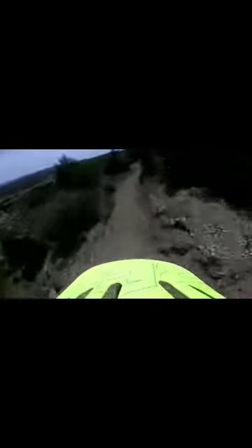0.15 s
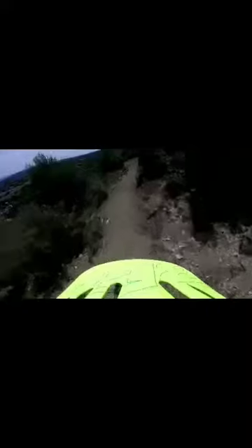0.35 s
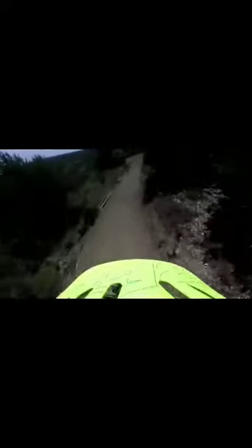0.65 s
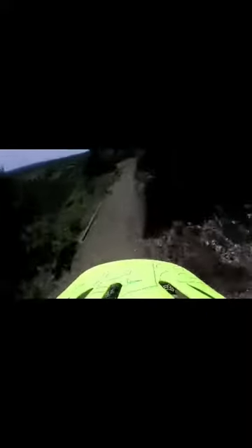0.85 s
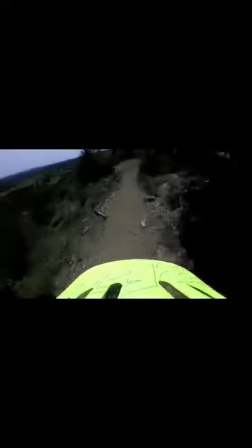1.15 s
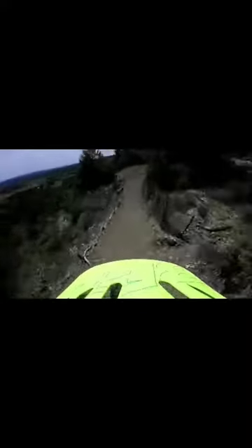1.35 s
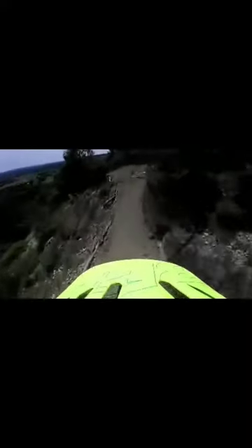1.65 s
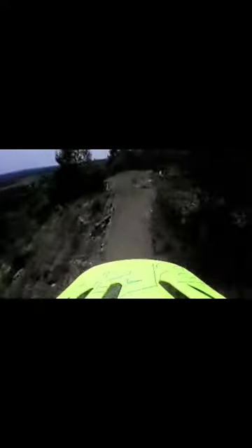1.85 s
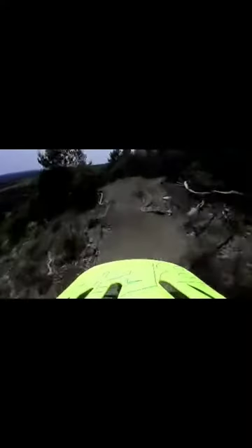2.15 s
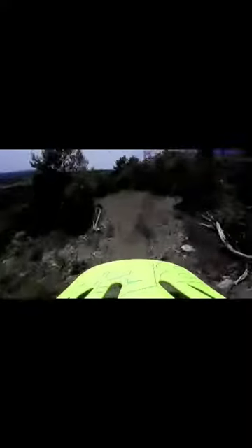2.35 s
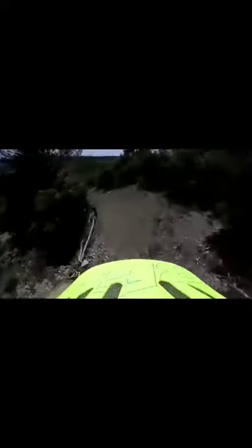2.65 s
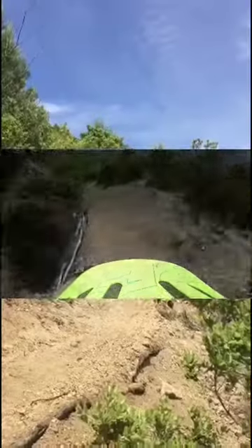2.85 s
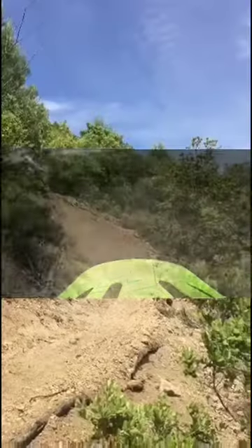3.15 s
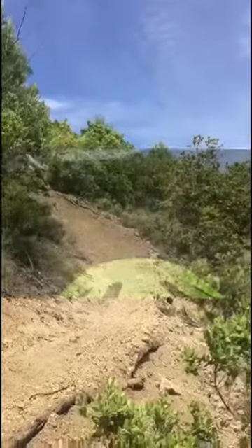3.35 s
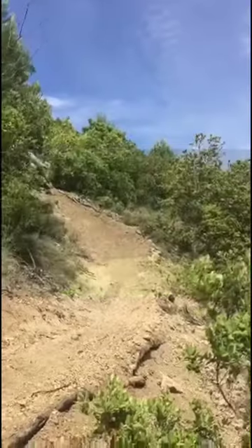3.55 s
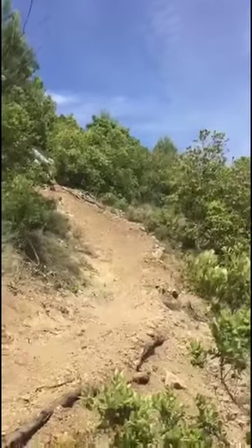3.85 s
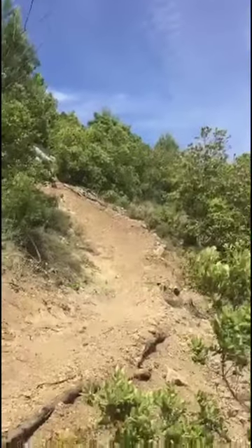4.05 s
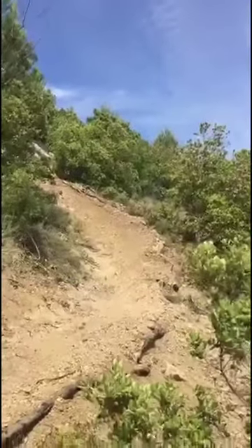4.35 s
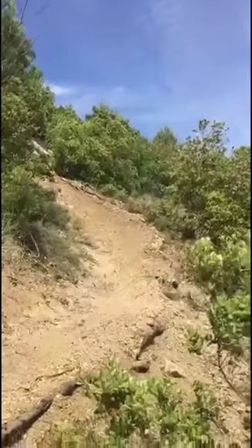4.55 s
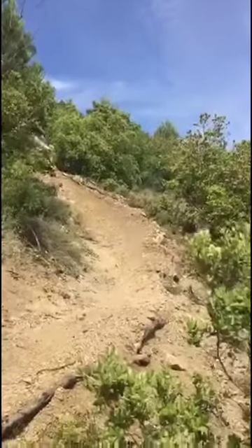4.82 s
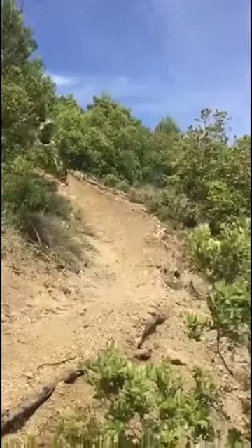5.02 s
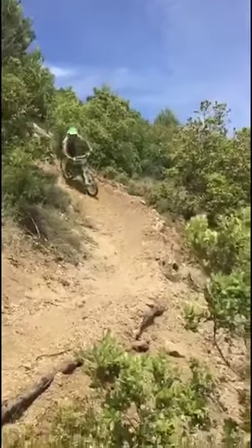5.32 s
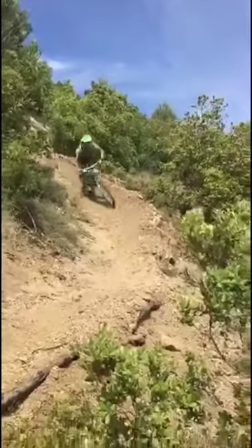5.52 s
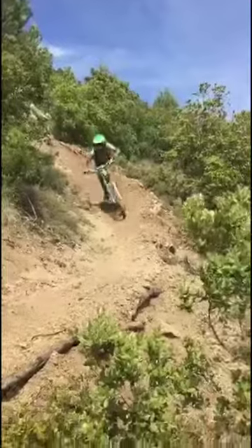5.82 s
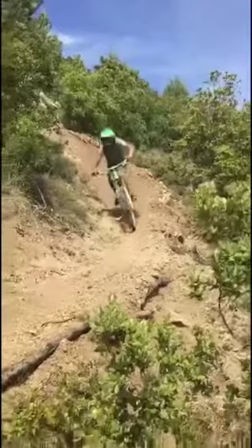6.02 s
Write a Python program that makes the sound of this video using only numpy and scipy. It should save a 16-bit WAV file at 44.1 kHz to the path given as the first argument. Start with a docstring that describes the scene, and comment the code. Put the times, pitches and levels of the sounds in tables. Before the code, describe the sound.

Outdoors on a dirt descent, muffled narrow-band sound close on a rider's helmet: fluctuating low wind, a thin whistling hiss, mount drumming and clicking rattles, ending in heavy jolts and a wind surge. Tyre crunch fades in beneath before the helmet sound cuts off. From the trailside come patchy, crackling scrapes of clods, grit and sand, busy stone clicks, and occasional high chain-like ticks, in a clearer but quieter perspective.

```python
"""A helmet camera rides a bicycle down a dry trail: wind buffets it, its mount drums, its closed housing
hisses and knocks. Wind, drumming and hiss are shaped noise; knocks and jolts set off dying tones.
The helmet sound stops abruptly, while the tyres fade in at a second microphone beside the trail.
They crunch and skid as patchy noise full of crackles, with stones, ticks and a low hum around them."""
import sys
import numpy as np
from scipy import signal
from scipy.io import wavfile
from scipy.ndimage import uniform_filter1d

SR = 44100
rng = np.random.default_rng(int(sys.argv[2]) if len(sys.argv) > 2 else 0)


def store_wav(level_fs):
    """Save 16-bit WAV to argv[1]."""
    pcm = np.round(np.clip(np.atleast_2d(level_fs), -1, 1) * 32767)
    wavfile.write(sys.argv[1], SR, pcm.T.astype(np.int16))


N = 272582  # length of the sound in samples

# How wind and hiss change on the ride. Each row: time in seconds, wind level in dB, hiss level in dB.
RIDE_LEVELS = [(0.0, -24.5, -51.5), (0.15, -32.5, -54), (0.6, -41, -53.5), (1.05, -33, -48.5),
               (1.27, -34.5, -44), (1.42, -35.5, -48.5), (1.72, -35.5, -48.5), (1.82, -29.5, -50),
               (2.1, -32, -53), (2.29, -33, -56), (2.35, -30.5, -46.5), (2.62, -41, -60.5),
               (2.8, -44.5, -55), (2.95, -39, -46), (3.02, -20.5, -37.5), (3.17, -18, -47.5),
               (3.36, -39.5, -58), (3.57, -31, -58), (3.66, -51, -53.5)]
# Colour of the wind buffeting. Each row: pitch in Hz, relative level per Hz in dB.
WIND_COLOUR = [(3, -20.5), (6, 16), (15, 3), (24, 0.5), (34, -15.5), (48, -7.5), (64, -23), (100, -45),
               (200, -70)]
# Modes of the mount, the second shaken by the wind. Each row: pitch in Hz, rough width in Hz.
MOUNT_MODES = [(85, 9), (49, 8), (155, 16)]
# The mount drums over rough stretches. Each row: start in seconds, length in seconds, level in dB.
DRUMMING = [(0.097, 0.134, -42.5), (0.411, 0.18, -39.5), (0.674, 0.15, -39), (0.897, 0.19, -42.5),
            (1.177, 0.41, -37.5), (1.612, 0.11, -40.5), (1.862, 0.22, -45.5), (2.325, 0.035, -30.5),
            (2.427, 0.059, -33.5), (2.721, 0.136, -42), (2.994, 0.024, -22.5), (3.132, 0.091, -28),
            (3.273, 0.15, -45.5)]
# How drumming comes and goes: attack in seconds, release in dB per second, resting level in dB.
DRUMMING_SHAPE = (0.014, 220, -50.5)
# Colour of the hiss through the closed housing. Each row: pitch in Hz, relative level per Hz in dB.
HISS_COLOUR = [(70, -30), (115, -10.5), (135, -6), (156, -3), (200, -16.5), (380, -17.5), (630, -19),
               (990, -28), (1200, -19), (1480, -19), (1700, -8.5), (2010, -22), (2520, -11), (3140, -19),
               (3630, -29), (5500, -37.5), (7000, -63.5)]
# How far each pitch follows the hiss level. Each row: pitch in Hz, share (1 is fully).
HISS_SURGE = [(300, 0.44), (1000, 0.13), (2500, 0.97), (5000, 0.45)]
# The hiss sings in the housing. Each row: pitch in Hz, rough width in Hz, level over the hiss level in dB.
HISS_WHISTLES = [(2520, 160, -8), (3066, 200, -13.5)]
# Modes of the housing. Each row: pitch in Hz, relative level in dB, time to fall by 60 dB in seconds.
HOUSING_MODES = [(450, -6.5, 0.027), (572.4, -9, 0.026), (912, -14, 0.053), (1140, -4.5, 0.0057),
                 (1365, 7, 0.012), (1703, 4.5, 0.01), (2305, 4, 0.011), (2520, 4.5, 0.01),
                 (2980, -6.5, 0.0128), (3300, -24, 0.0078)]
# Hard knocks on one spot. Each row: time in seconds, relative level in dB, pitch of the spot in Hz,
# length in seconds, snap in dB and rebound in dB (both relative to the knock).
HARD_KNOCKS = [(2.19, -32, 2400, 0.0014, -9, -19), (2.34, -22, 1560, 0.00211, -33.5, -21.5),
               (2.4118, -12.5, 1470, 0.0013, -44, -19.5), (2.419, -12, 1900, 0.0021, -31, -20),
               (3.0137, -8.5, 1590, 0.0022, -45, -11.5), (3.1545, -6.5, 2520, 0.0024, -9, -28.5),
               (3.162, -4.5, 1410, 0.0011, -45, -16), (3.1891, -2.5, 2130, 0.0047, -36.5, -23),
               (3.2285, -25.5, 1400, 0.002, -42, -25), (3.293, -35.5, 1250, 0.00175, -40, -20)]
# The camera rattles lightly in its housing. Each row: time in seconds, relative level in dB.
RATTLES = [(0.072, -34), (0.1276, -31.5), (0.2178, -28), (0.2903, -26), (0.424, -26), (0.5234, -27),
           (0.816, -22), (0.907, -35), (0.934, -24.5), (1.0096, -29), (1.0717, -31.5), (1.17, -36.5),
           (1.284, -32), (1.4973, -37), (1.5586, -27.5), (1.5816, -30.5), (1.7247, -40), (1.759, -31),
           (1.8348, -35), (1.858, -31), (1.905, -31), (2.031, -35), (2.0841, -32), (2.1168, -29),
           (2.2505, -32.5), (2.2977, -29), (2.4677, -33.5)]
# Hard jolts, and last a slow low swell of wind pressure just before the helmet sound stops. Each row: time in
# seconds, relative level in dB, pitch of the thump in Hz.
HARD_JOLTS = [(2.335, -23, 91), (2.408, -19.5, 63.5), (3.01, -10.5, 73), (3.157, -9.5, 48.5),
              (3.19, -8, 75), (3.223, -30, 52.4), (3.658, -25, 28)]
# Helmet and mount ringing after a jolt. Each row: pitch in Hz, level relative to the thump in dB,
# time to fall by 60 dB in seconds.
HELMET_RINGING = [(52.7, -13, 0.47), (165.4, -19, 0.1), (269, -18, 0.094)]
# The tyres beside the trail fade in. Each row: time in seconds, gain in dB.
TYRE_FADE = [(2.9, -24), (3.2, -8), (3.45, -0.2)]
# The tyres dig in, patch after patch. Each row: start in seconds, length in seconds,
# relative crunch level in dB, grit over crunch in dB, sand over crunch in dB.
SKID_PATCHES = [(3.195, 0.286, -53, -4, -27), (3.477, 0.2, -49.5, -6, -34), (3.676, .025, -50.5, -9, -22),
                (3.715, 0.055, -48, -8, -37.5), (3.787, .11, -46, -9.5, -24),
                (3.906, 0.062, -47, -9.5, -20), (3.959, 0.083, -48, -7.5, -21.5),
                (4.07, 0.068, -54.5, -16, -28), (4.115, 0.075, -50, -8, -30), (4.229, 0.0835, -52, -8, -36),
                (4.319, 0.0652, -47, -10.5, -22), (4.406, 0.036, -51.5, -10, -24),
                (4.458, 0.036, -56.5, -6.5, -8), (4.526, 0.16, -50.5, -3, -19),
                (4.671, 0.11, -47.5, -7, -13), (4.79, .13, -44, -6, -23), (4.947, 0.053, -60, -3, -16),
                (4.99, 0.03, -45.5, -4, -11.5), (5.033, 0.041, -48, -4, -9.5),
                (5.101, 0.054, -58, -11, -5.5), (5.256, 0.054, -54, 0, -5), (5.344, 0.03, -44, -6.5, -12.5),
                (5.402, 0.02, -46, -5.5, -10.5), (5.427, 0.046, -56.5, -1, -1.5),
                (5.478, 0.035, -49.5, -3, -8.5), (5.52, 0.0365, -52, -11, -11),
                (5.558, 0.066, -47.5, -9.5, -12), (5.627, 0.093, -46, -14, -19.5),
                (5.747, 0.093, -46.5, -14.5, -18.5), (5.845, 0.057, -48.5, -10.5, -19),
                (5.907, 0.02, -44, -13, -21), (5.953, 0.16, -51.5, -11.5, -21),
                (6.076, .07, -48.5, -11.5, -21), (6.159, .03, -42.5, -18, -30)]
# How a patch comes and goes: attack in seconds, release in dB per second, resting crunch level in dB.
PATCH_SHAPE = (0.0093, 323, -63)
# Colours of the clods, grit, sand and low roll. Each row: pitch in Hz, relative level per Hz in dB.
CLOD_COLOUR = [(300, -21.5), (520, -5.5), (850, -3.5), (1300, -5.5), (1900, -11), (3000, -46)]
GRIT_COLOUR = [(1200, -17), (2000, -1), (3000, 0.9), (4200, -13.5), (6000, -45.5)]
SAND_COLOUR = [(2800, -29), (4200, 1), (5500, -0.5), (7000, -1), (8200, -14.5)]
ROLL_COLOUR = [(40, -41), (65, -3.5), (90, 6), (230, -1), (330, 3.5), (420, -40.5)]
# The low roll of the tyres, before it follows the crunch. Each row: time in seconds, level in dB.
ROLL_LEVELS = [(3.7, -55.5), (4.3, -52.5), (4.42, -48.5), (4.51, -63), (4.55, -51), (4.66, -56),
               (4.69, -47.5), (5.13, -53.5), (5.18, -64), (5.25, -62), (5.28, -53.5), (5.34, -62),
               (5.5, -56), (5.62, -52.5), (5.71, -63), (5.79, -50.5), (5.86, -57), (6.18, -60)]
# Stones kicked and crushed. Each row: time in seconds, relative level in dB, centre pitch in Hz,
# length in seconds.
STONE_HITS = [(3.432, -38.5, 2480, .004), (3.488, -32.5, 1157, .01), (3.515, -32, 1420, 0.016),
              (3.523, -37.5, 2920, 0.0064), (3.692, -35, 1600, .008), (3.75, -38.5, 1160, .006),
              (3.845, -34, 880, 0.0067), (3.908, -34, 795, 0.013), (4.127, -46, 685, 0.0074),
              (4.182, -41, 550, 0.0097), (4.246, -42, 830, 0.0076), (4.349, -35.5, 603, 0.014),
              (4.405, -43, 460, .006), (4.427, -40, 527, 0.0069), (4.541, -28.5, 890, .003),
              (4.559, -30.5, 1300, 0.004), (4.581, -32, 1240, 0.0036), (4.608, -32.5, 1450, 0.0026),
              (4.629, -31, 2270, 0.0026), (4.645, -34, 960, .004), (4.671, -29.5, 930, 0.0031),
              (4.686, -33, 500, 0.0045), (4.732, -29, 1290, 0.0023), (4.74, -30, 1430, 0.012),
              (4.763, -36, 1350, 0.0036), (4.799, -33, 793, 0.013), (4.823, -34, 1870, 0.0074),
              (4.846, -39, 3300, .004), (4.861, -38, 2900, 0.0058), (4.873, -39, 950, 0.0079),
              (4.913, -26.5, 1510, 0.00255), (4.992, -32.5, 2800, 0.0089), (5.005, -31, 930, 0.0067),
              (5.052, -30.5, 766, 0.0075), (5.079, -31, 3340, 0.0062), (5.099, -36.5, 2190, 0.0044),
              (5.305, -35.5, 2800, 0.0068), (5.352, -34, 860, 0.016), (5.409, -34, 1500, 0.0069),
              (5.479, -39, 1660, 0.013), (5.498, -39, 1550, 0.0055), (5.579, -37, 895, 0.01),
              (5.758, -32.5, 663, 0.0049), (5.789, -33, 600, .005), (5.917, -33, 1100, 0.0084),
              (6.081, -39, 656, 0.01), (6.172, -32, 824, 0.011)]
# Sharp high ticks, likely the chain. Each row: time in seconds, relative level in dB.
SHARP_TICKS = [(3.6855, -41), (4.3478, -42), (4.685, -40), (5.0784, -28.5), (5.124, -38), (5.359, -37.5),
               (5.493, -34.5), (5.532, -39), (5.598, -33.5), (5.818, -39), (5.8857, -43), (5.9202, -38)]
# Swells of a low hum, likely tyre and frame. Each row: start in seconds, length in seconds, level in dB.
HUM_SWELLS = [(4.95, 0.13, -54.5), (5.41, 0.11, -52), (5.63, 0.049, -47.5), (5.77, 0.098, -52.5),
              (6.119, .06, -53)]
# How a swell comes and goes: attack in seconds, release in dB per second, resting level in dB.
SWELL_SHAPE = (0.025, 115, -71)

CUT_S, HELMET_EDGE_HZ = 3.666, 5600  # when the helmet camera stops, and the top of its narrow band
USUAL_HISS_DB = -47  # the surge brightens the hiss above this level and dulls it below
REBOUND_S = 0.0075  # delay of the camera's rebound after a knock
RATTLE_HZ, RATTLE_S = 2400, 0.0017  # pitch of the struck spot, length of the blow
RATTLE_SNAP_DB, RATTLE_REBOUND_DB = -35, -6.5
THUMP_T60_S = 0.1
PING_S, PING_DB, PING_HZ, PING_T60_S = 3.192, -35, 1830, 0.33
REST_GRIT_DB, REST_SAND_DB = -7.5, -11  # over the crunch, between patches
ROLL_FOLLOWS = 0.28  # share of the crunch's swings that the low roll follows
HUM_HZ = 279.8
TRAIL_EDGE_HZ, LAST_EDGE_HZ = 7950, 15800  # top of the trail-side microphone, top of the whole


def helmet():
    """All the helmet sounds pass through the small camera's narrow band and stop abruptly."""
    t = np.arange(N) / SR
    wind_db, hiss_db = columns(RIDE_LEVELS, t)
    out = wind(wind_db) + mount(wind_db) + housing_hiss(hiss_db)
    out += hard_knocks() + light_rattles(hiss_db) + jolts()
    return low_pass(out, HELMET_EDGE_HZ) * (t < CUT_S)


def wind(wind_db):
    """Wind buffets the camera: low noise with a slightly restless level."""
    return gain_of(wind_db) * steady(WIND_COLOUR, size=4096, patchy_db=0.5, flicker_db=1.0)


def mount(wind_db):
    """The mount sounds at its own pitches: two drum over rough ground, one is shaken by the wind."""
    low_mode, wind_mode, high_mode = MOUNT_MODES
    drum_gain = gain_of(spells(*np.transpose(DRUMMING), *DRUMMING_SHAPE))
    drumming = drum_gain * (waver(*low_mode) + 0.17 * waver(*high_mode))
    return drumming + gain_of(wind_db - 10) * waver(*wind_mode)


def housing_hiss(hiss_db):
    """Hiss through the closed housing changes colour as it surges, and sings at two pitches."""
    def shape_db(hz, t):
        surge_db = columns(RIDE_LEVELS, t)[1] - USUAL_HISS_DB
        return read(HISS_COLOUR, hz) + read(HISS_SURGE, hz) * surge_db

    hiss = noise(shape_db, size=512, patchy_db=2.0, flicker_db=1.17)
    out = gain_of(-49) * evened(hiss)
    for hz, width_hz, over_db in HISS_WHISTLES:
        out += gain_of(hiss_db + over_db) * waver(hz, width_hz)
    return out


def hard_knocks():
    """Hard blows on one spot of the housing ring mostly the modes near that spot's pitch."""
    out = np.zeros(N)
    draws = rng.standard_normal((len(HARD_KNOCKS), 900))
    for (s, *blow), draw in zip(HARD_KNOCKS, draws):
        add(out, s - 0.001, knock(draw, *blow, spread=0.638, firm=0.37))
    return out


def light_rattles(hiss_db):
    """The camera rattles lightly in its housing, shaking all of it, over many fainter rattles."""
    out = np.zeros(N)
    blow = RATTLE_HZ, RATTLE_S, RATTLE_SNAP_DB, RATTLE_REBOUND_DB
    draws = rng.standard_normal((len(RATTLES), 900))
    for (s, level_db), draw in zip(RATTLES, draws):
        add(out, s - 0.001, knock(draw, level_db, *blow, spread=4.0, firm=1.1))
    hits = gain_of(1.8 * rng.exponential(1, N)) * (rng.random(N) < 45 / SR)  # about 45 per second
    one_rattle = knock(rng.standard_normal(900), 0, *blow, spread=2.4)
    faint = evened(signal.oaconvolve(hits, one_rattle)[:N])
    return out + gain_of(hiss_db - 14.5) * faint


def jolts():
    """A hard jolt thumps and leaves helmet and mount ringing, as does a slow swell of wind pressure just before
    the helmet sound stops; the hardest knock leaves a thin ping."""
    out = np.zeros(N)
    shell = sum(ringing(db, hz, t60) for hz, db, t60 in HELMET_RINGING)
    for s, level_db, thump_hz in HARD_JOLTS:
        add(out, s, gain_of(level_db) * (ringing(0, thump_hz, THUMP_T60_S) + shell))
    add(out, PING_S, ringing(PING_DB, PING_HZ, PING_T60_S))
    return out


def knock(draw, level_db, hz, length, snap_db, rebound_db, spread, firm=0.8):
    """Impacts ring the housing, most near the struck spot; a snap is added and the camera rebounds once."""
    t = np.arange(SR // 20) / SR
    ring = np.zeros(len(t))
    for mode_hz, db, t60 in HOUSING_MODES:
        reach = np.exp(-(np.log2(mode_hz / hz) / spread) ** 2) + 0.13  # far modes still sound a little
        ring += reach * gain_of(db - 60 * t / t60) * np.sin(2 * np.pi * mode_hz * t)
    ring *= (1 - np.exp(-t / 0.00052)) ** 2  # soft start
    sound = unit(signal.fftconvolve(burst(draw, length, firm), ring), length)
    snap = resonate(resonate(burst(draw, 1.1 * length, firm), 4700, 3600), 4700, 3600)
    add(sound, 0, gain_of(snap_db) * unit(snap, length))
    rebound = signal.fftconvolve(burst(draw[::-1], length), ring)
    add(sound, REBOUND_S, gain_of(rebound_db) * unit(rebound, length))
    return gain_of(level_db) * 0.52 * sound


def tyres():
    """Tyres dig into clods, grit and sand: each is a patchy wash with crackles, over a low roll."""
    start, length, db, grit_over, sand_over = np.transpose(SKID_PATCHES)
    attack_s, release, rest_db = PATCH_SHAPE
    clods_db = spells(start, length, db, attack_s, release, rest_db)
    grit_db = spells(start, length, db + grit_over, attack_s, release, rest_db + REST_GRIT_DB)
    sand_db = spells(start, length, db + sand_over, attack_s, release, rest_db + REST_SAND_DB)
    swings_db = clods_db - uniform_filter1d(clods_db, size=SR // 2)
    roll_db = columns(ROLL_LEVELS, np.arange(N) / SR)[0] + ROLL_FOLLOWS * swings_db

    scrape = (2, 20)  # patches narrow in pitch and drawn out in time colour the scraping
    clods = 0.94 * steady(CLOD_COLOUR, size=256, patchy_db=3.0, flicker_db=1.0, patch=scrape)
    clods += 0.63 * grains(CLOD_COLOUR, per_s=450, cycles=4.1, spread_db=2.8, count=10)
    grit = 1.33 * steady(GRIT_COLOUR, size=256, patchy_db=4.5, flicker_db=1.0, patch=scrape)
    grit += 0.5 * grains(GRIT_COLOUR, per_s=450, cycles=6, spread_db=1.6, count=8)
    sand = 1.16 * steady(SAND_COLOUR, size=256, patchy_db=5.5, flicker_db=1.5, patch=scrape)
    sand += 0.18 * grains(SAND_COLOUR, per_s=420, cycles=19, spread_db=1.8, count=10)
    roll = steady(ROLL_COLOUR, size=1024, patchy_db=2.0, flicker_db=0.8)

    crunch = tread_bites() * (gain_of(clods_db) * clods + gain_of(grit_db) * grit)
    return crunch + gain_of(sand_db) * sand + gain_of(roll_db) * roll


def tread_bites():
    """Tread knobs bite in about 110 times a second; each bite lifts the crunch and dies away in 6 ms."""
    sizes = gain_of(4 * np.minimum(rng.exponential(1, N), 3))
    hits = sizes * (rng.random(N) < 110 / SR)
    dying = signal.lfilter([1], [1, -np.exp(-1 / (0.006 * SR))], hits)
    return 0.68 + 0.32 * evened(dying)


def grains(points, per_s, cycles, spread_db, count):
    """Short crackles of many pitches, each pitch with its own sparse train of uneven sizes."""
    out = np.zeros(N)
    for hz in np.geomspace(points[1][0], points[-2][0], count):
        t = np.arange(int(3 * cycles * SR / hz)) / SR
        hits = rng.random((int(per_s / count * N / SR), 2))
        places = (hits[:, 0] * N).astype(int)
        size = np.zeros(N)
        size[places] = gain_of(spread_db * np.minimum(-np.log(1 - hits[:, 1]), 4))
        crackle = np.sin(2 * np.pi * hz * t) * t * hz * np.exp(-2 * t * hz / cycles)
        level = gain_of(read(points, hz)) * hz / cycles
        out += level * signal.oaconvolve(size, crackle)[:N] / 1000
    return evened(out)


def stones():
    """Each stone gives a dry crack and a noisy crunch around its pitch, swelling when long."""
    out = np.zeros(N)
    draws = rng.standard_normal((len(STONE_HITS), 1800))
    for (s, level_db, hz, length), draw in zip(STONE_HITS, draws):
        swell = 1 - np.exp(-np.arange(len(draw)) / (0.47 * abs(length) * SR))
        crunch = burst(draw * swell, length, firm=0.45)
        for width_hz in (0.5 * hz, hz, 1.5 * hz):
            crunch = resonate(crunch, hz, width_hz)
        crack = resonate(resonate(burst(draw, 0.0015, firm=0.3), 2300, 1900), 2300, 2400)
        stone = 0.36 * unit(crunch, abs(length)) + 0.11 * unit(crack, 0.0012)
        add(out, s - 0.001, gain_of(level_db) * stone)
    return out


def ticks():
    """Sharp ticks, likely the chain: brief bursts of impacts through one high, wide resonance."""
    out = np.zeros(N)
    draws = rng.standard_normal((len(SHARP_TICKS), 600))
    for (s, level_db), draw in zip(SHARP_TICKS, draws):
        tick = resonate(burst(draw, 0.0053, firm=0.22), 6500, 3700)
        add(out, s - 0.001, gain_of(level_db) * 0.34 * unit(tick, 0.003))
    return out


def hum():
    """A fuzzy low tone, likely tyre and frame, comes and goes in swells."""
    return gain_of(spells(*np.transpose(HUM_SWELLS), *SWELL_SHAPE)) * waver(HUM_HZ, 24)


def burst(draw, length, firm=0.8):
    """One firm impact amid a cluster of tiny ones that dies out soon after the length."""
    t = np.arange(len(draw)) / SR
    rubble = draw * (1 - np.exp(-t / 0.00098)) * np.exp(-(t / max(length, 0.0006)) ** 1.5)
    impact = np.arange(len(draw)) == 30  # a single sample
    return rubble + firm * np.linalg.norm(rubble) * impact


def ringing(peak_db, hz, t60):
    """One mode, struck softly and dying away."""
    u = np.arange(SR // 2) / SR
    return gain_of(peak_db - 60 * u / t60) * np.sin(2 * np.pi * hz * u) * (1 - np.exp(-u / 0.0034))


def waver(hz, width_hz):
    """A fuzzy tone: resonating noise that drifts in pitch but keeps a fairly even strength."""
    tone = resonate(resonate(rng.standard_normal(N), hz, width_hz), hz, 2 * width_hz)
    strength = np.sqrt(uniform_filter1d(tone ** 2, size=int(SR / hz)) + 0.19 * np.mean(tone ** 2))
    return evened(tone / strength ** 0.55)


def spells(starts, lengths, levels_db, attack_s, release_db_per_s, rest_db):
    """Level in dB of spells that rise, hold and die away over a steady rest; their powers add."""
    power = np.full(N, gain_of(rest_db) ** 2)
    for s, length, db in zip(starts, lengths, levels_db):
        u = np.arange(round((length + 0.4) * SR)) / SR
        rise = np.minimum(u / attack_s, 1)
        fall = gain_of(db - release_db_per_s * np.maximum(u - length, 0))
        add(power, s, (rise * fall) ** 2)
    return 10 * np.log10(power)


def noise(shape_db, size, patchy_db, flicker_db, patch=(6, 8)):
    """Random short-time spectra; shape_db(hz, t) gives the level; patches and shared flicker roughen it."""
    hop = size // 4
    t = np.arange(N // hop + 5) * hop / SR
    hz = np.fft.rfftfreq(size, 1 / SR)[:, None]
    a, b, patches = rng.standard_normal((len(t), len(hz), 3)).T
    patches = uniform_filter1d(patches, size=patch[0], axis=0)  # along pitch
    patches = evened(uniform_filter1d(patches, size=patch[1], axis=1))  # along time
    flicker = evened(uniform_filter1d(rng.standard_normal(len(t)), size=3))
    level = gain_of(shape_db(hz, t) + patchy_db * patches + flicker_db * flicker)
    return signal.istft((a + 1j * b) * level, nperseg=size, noverlap=size - hop)[1][:N]


def steady(points, size, patchy_db, flicker_db, patch=(6, 8)):
    """Noise whose underlying colour stays the same, scaled to rms 1."""
    return evened(noise(lambda hz, t: read(points, hz) + 0 * t, size, patchy_db, flicker_db, patch))


def resonate(x, hz, width_hz):
    """A fixed resonance, as a two-pole peak."""
    return signal.lfilter(*signal.iirpeak(hz, hz / width_hz, SR), x)


def low_pass(x, hz):
    """Removes what lies above hz, without delay."""
    return signal.oaconvolve(x, signal.firwin(511, hz, window=("kaiser", 9), fs=SR), "same")


def gain_of(db):
    """Turns dB into a plain factor."""
    return 10 ** (np.asarray(db) / 20)


def evened(x):
    """Scales a signal to rms 1."""
    return x / np.sqrt(np.mean(x ** 2) + 1e-20)


def unit(sound, length):
    """Scales a short sound to rms 1 over its length."""
    return sound / np.sqrt(np.sum(sound ** 2) / (SR * length))


def read(points, hz):
    """Reads a table of pitches at hz, with straight lines over log pitch."""
    f, value = np.transpose(points)
    return np.interp(np.log(hz + 1), np.log(f + 1), value)


def columns(rows, t):
    """Reads each column of a timed table at the times t, with straight lines between rows."""
    s, *values = np.transpose(rows)
    return [np.interp(t, s, v) for v in values]


def add(mix, s, sound):
    """Adds a sound into the mix from second s on."""
    part = mix[round(s * SR):][:len(sound)]
    part += sound[:len(part)]


def scene():
    """The helmet camera, then the trail side, where the tyres fade in."""
    fade = gain_of(columns(TYRE_FADE, np.arange(N) / SR)[0])
    trail_side = fade * tyres() + stones() + ticks() + hum()
    return (helmet() + low_pass(trail_side, TRAIL_EDGE_HZ))[None]


def record(dry):
    """A faint electronic hiss, then the last band limit."""
    hiss = gain_of(-93.5) * rng.standard_normal(N)
    return low_pass(dry[0] + hiss, LAST_EDGE_HZ)[None]


dry = scene()
out = record(dry)
store_wav(out)
```